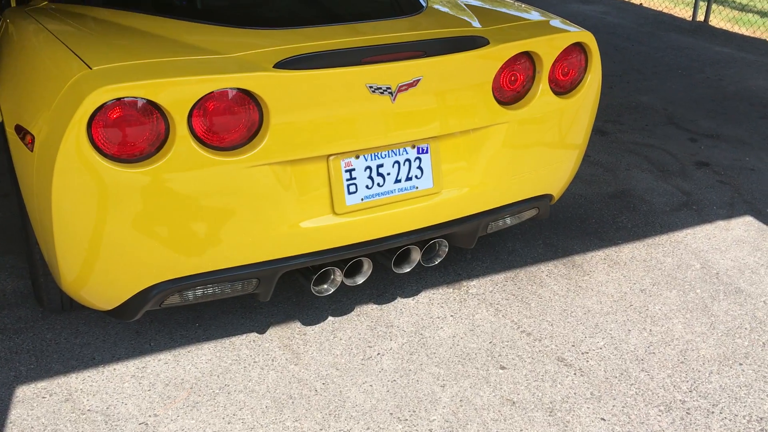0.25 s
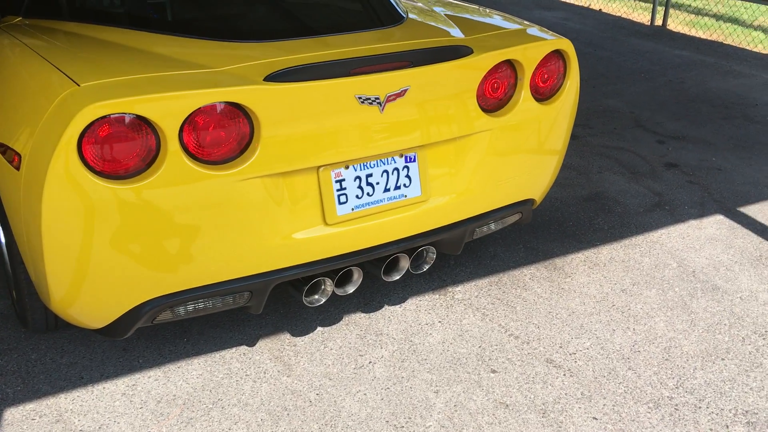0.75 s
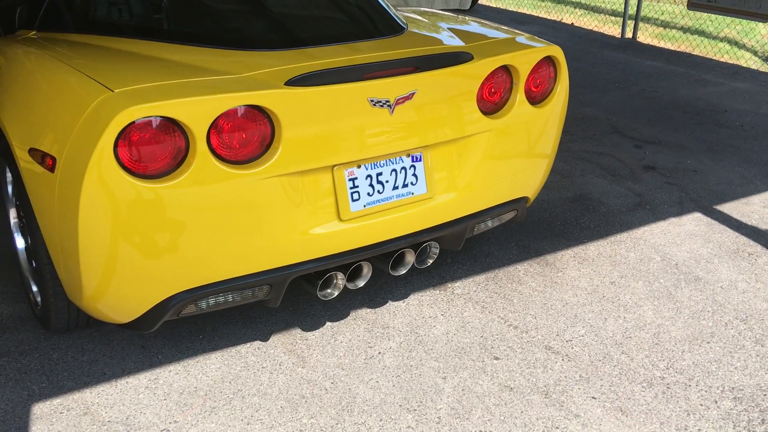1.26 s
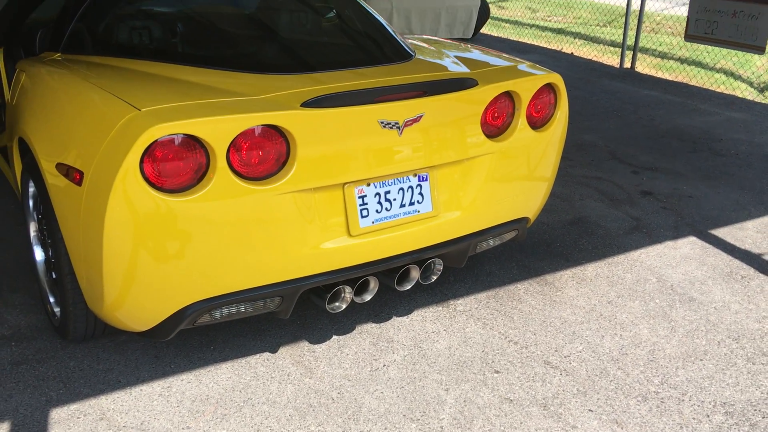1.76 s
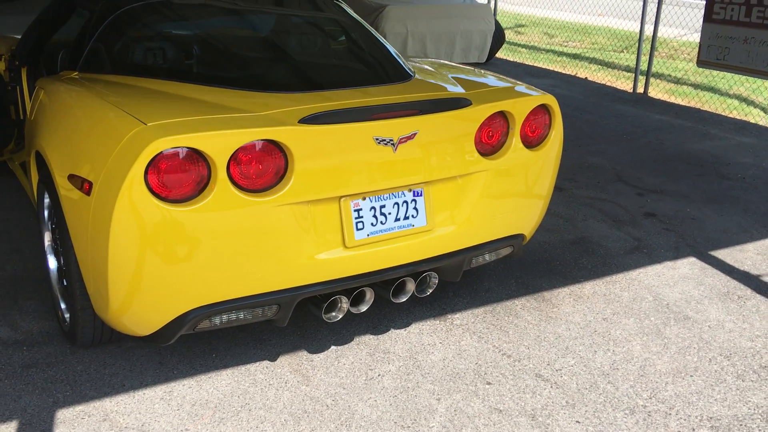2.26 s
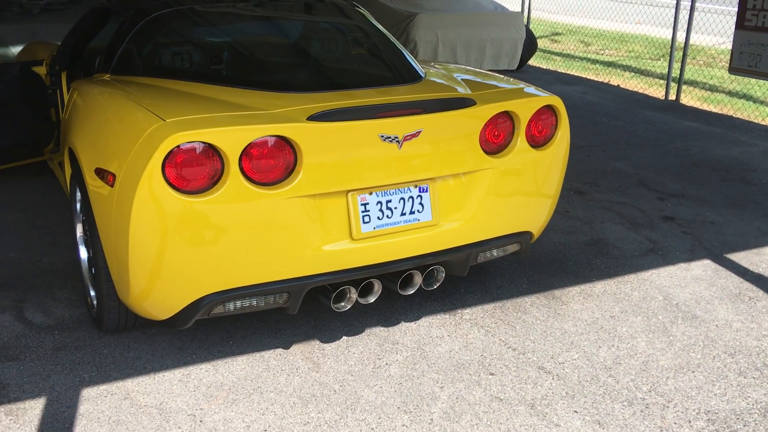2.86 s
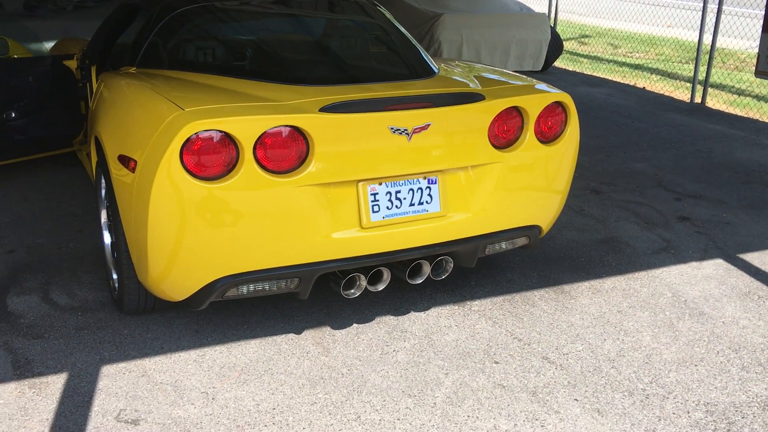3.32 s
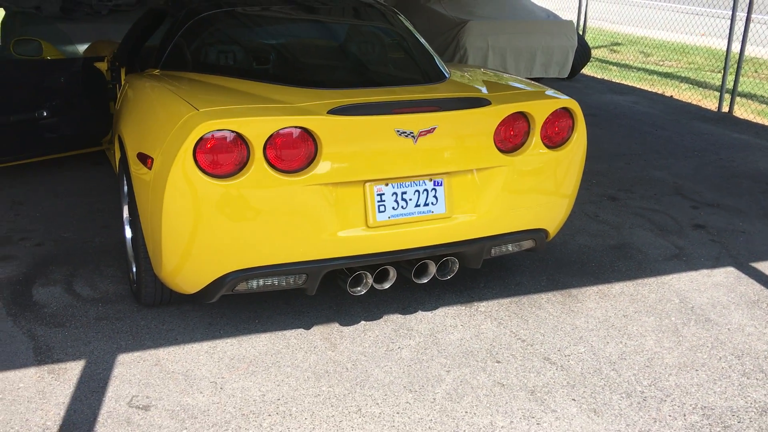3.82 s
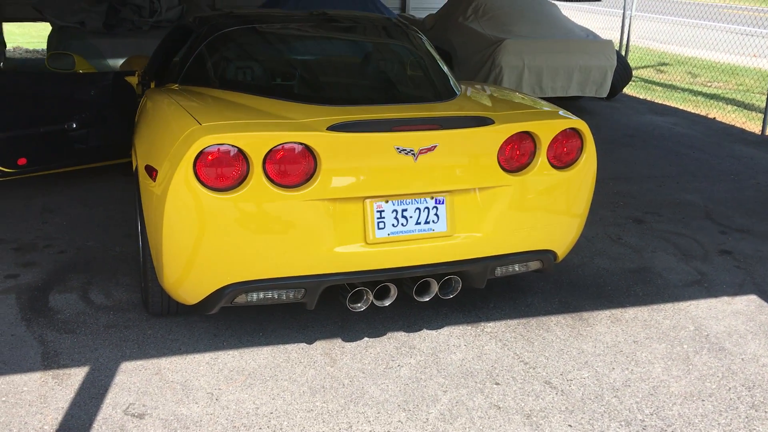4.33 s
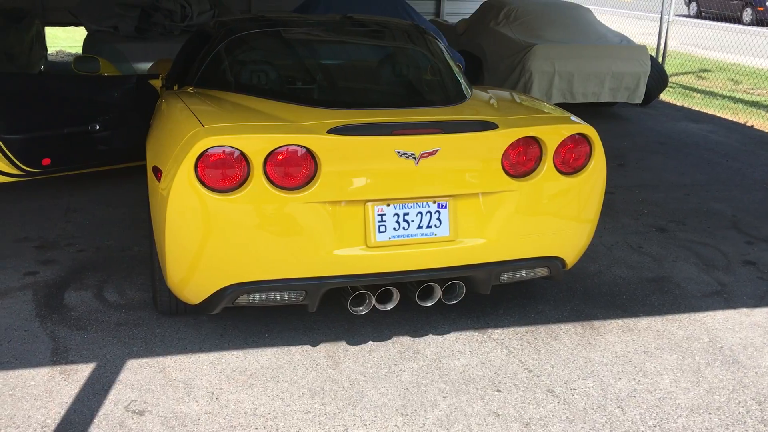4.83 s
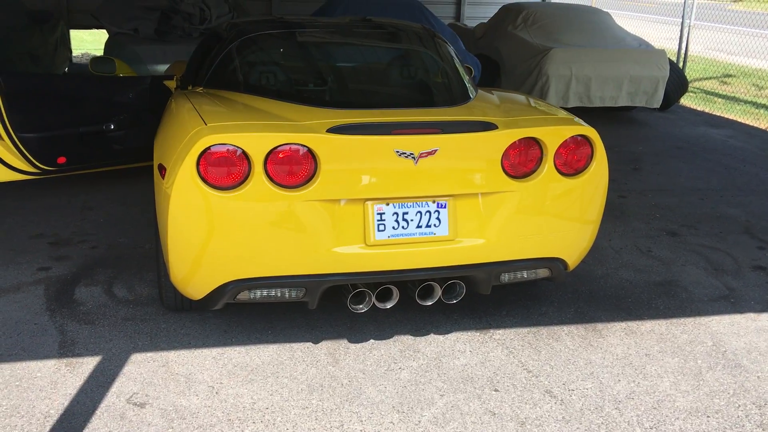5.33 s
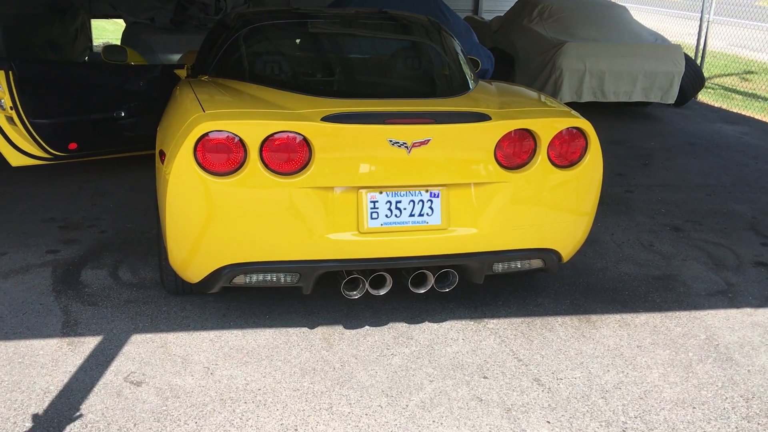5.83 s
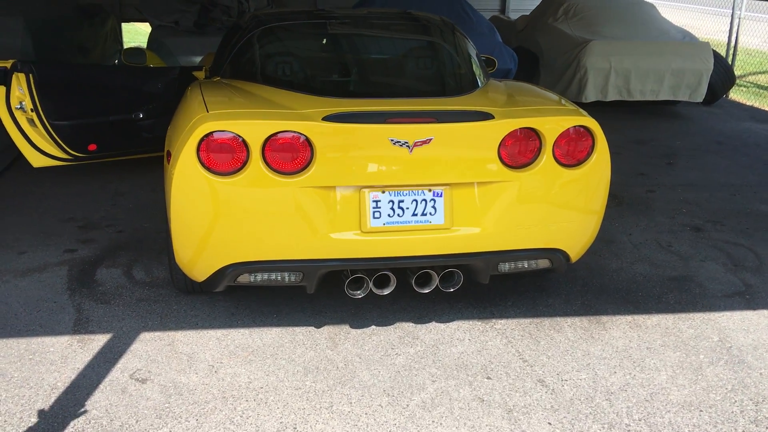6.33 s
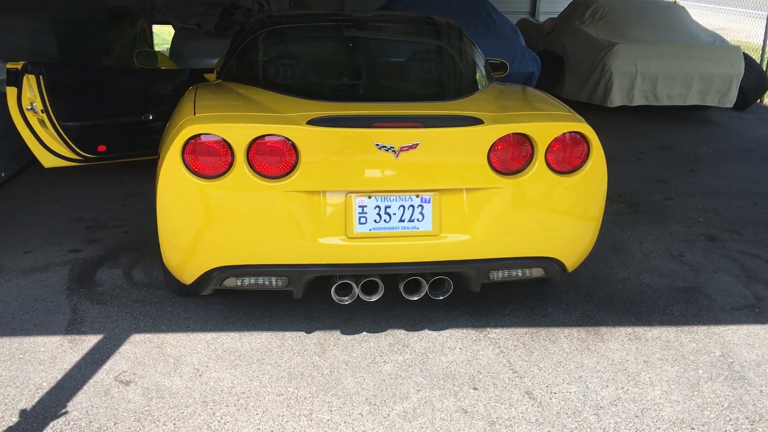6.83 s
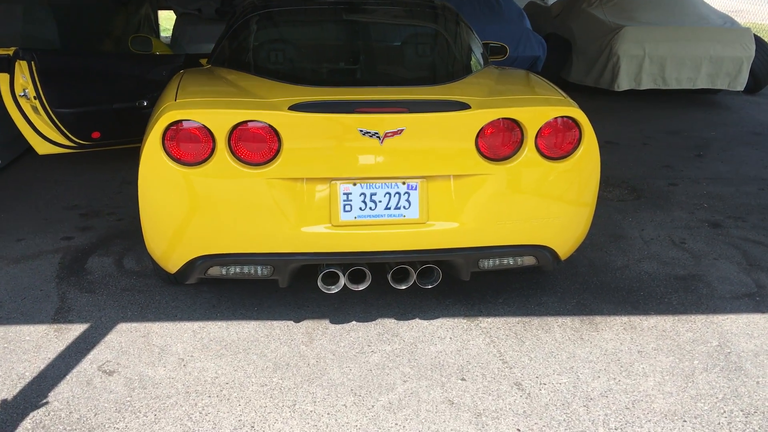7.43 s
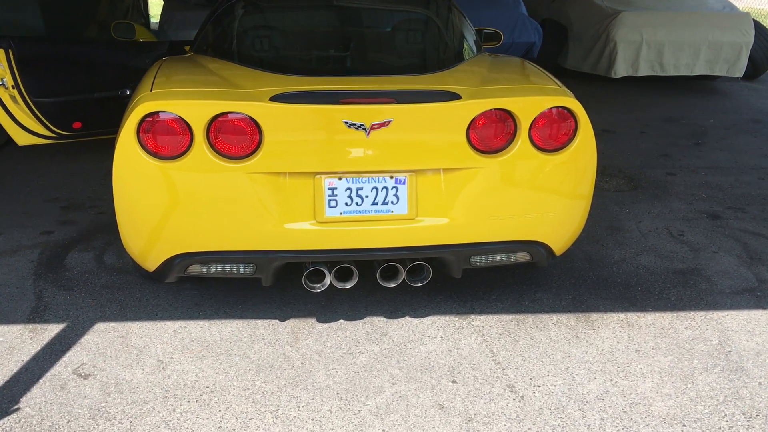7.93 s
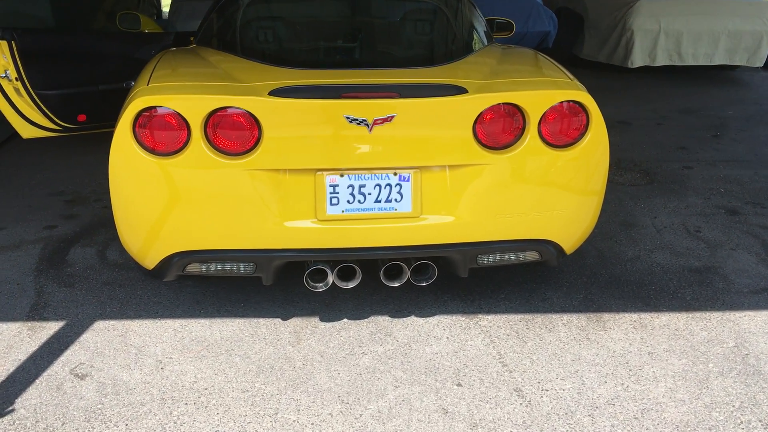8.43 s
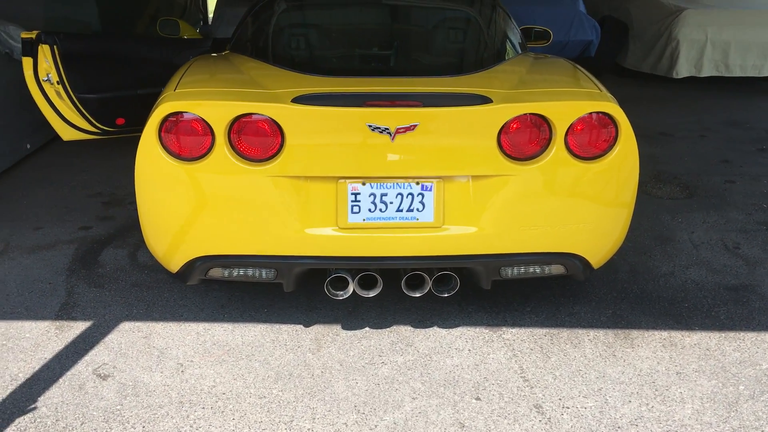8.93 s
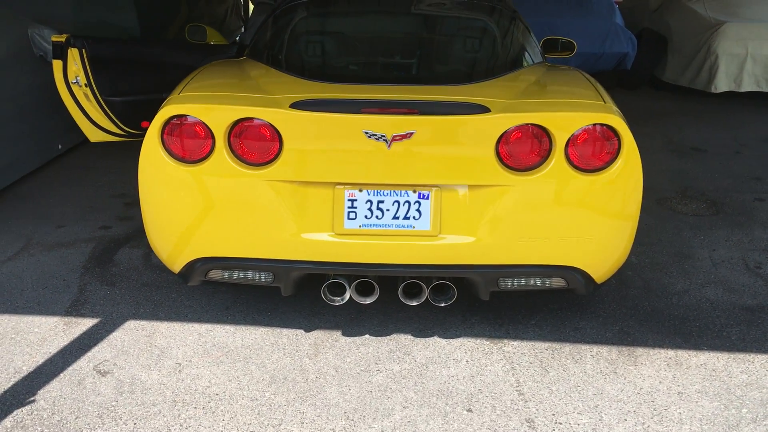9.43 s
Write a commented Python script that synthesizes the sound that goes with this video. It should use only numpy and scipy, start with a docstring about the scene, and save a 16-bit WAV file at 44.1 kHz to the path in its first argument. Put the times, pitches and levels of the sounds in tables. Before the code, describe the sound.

A V8 sports car idles from start to finish, close by under a carport. Its loud exhaust makes a deep, booming throb that surges and dips a little under twice a second, while the engine speed barely wanders. For the first 3 seconds or so, heard from the rear corner, the surges are fairly smooth and rounded, with a throaty growl. Around 4 seconds they start breaking into separate hard, raspy pops, each with a faint spit of gas. From about 7 seconds until the end, near 10 seconds, the microphone moves directly behind the tailpipes, and the barks are more distinct and uneven over the same low lope. A faint whirr of belts and fan with light valve ticking stays in the background, and the carport adds a slight reverberation.

```python
"""A deep, loping throb: a V8 sports car idles under a carport as the listener walks from its rear corner
to the tailpipes. Every sixteen firings (two engine cycles) bring a surge and a lull, and the surge slowly
breaks up into separate hard pops. Each firing is a pressure pulse that booms in the muffler, barks in the
pipe and spits turbulent gas from the tips. The carport reverberates, and the engine bay whirrs behind."""
import sys
import numpy as np
from scipy import signal
from scipy.io import wavfile
from scipy.ndimage import uniform_filter1d

SR = 44100
rng = np.random.default_rng(int(sys.argv[2]) if len(sys.argv) > 2 else 0)


def wrap_up_sound(samples):
    """Save the sound to the file named by the first command line argument, as 16-bit audio."""
    columns = np.atleast_2d(samples).T
    # keep every value between -1 and 1, then stretch to whole-number steps
    tamed = np.clip(columns, -1, 1)
    steps = np.round(tamed * 32767).astype(np.int16)
    wavfile.write(sys.argv[1], SR, steps)


N = 426447
LOPE = 16  # firings in one surge and lull

# the listener's walk: (time [s], place [0 corner, 1 passing, 2 behind])
WALK = [(0, 0.31), (1.1, 0.41), (2.2, 0.61), (4, 0.95), (5.5, 1.5), (7, 1.53), (9.7, 2.28)]
# the surge of hard burns, which creeps earlier in the firing order and breaks up into pops:
# (time [s], middle [firings], length [firings], unevenness [factor on the accents])
SURGE = [(0, 10.68, 11.5, 0.26), (1.6, 9.1, 9.6, 0.059), (2.3, 6.27, 9.3, .37), (3.2, 5.57, 9.4, 0.2),
         (4.1, 4.47, 8.8, 1.28), (6.2, 4.14, 8, 1.3), (7.4, 3.17, 9.8, 1.58), (7.8, 1.62, 10.9, 1.52),
         (9.7, 1.92, 11.75, 1.18)]


def amp(db):
    """Amplitude ratio of a level in decibels."""
    return 10 ** (np.asarray(db) / 20)


def unit(x):
    """Normalisation to an rms of one."""
    return x / np.sqrt(np.mean(x ** 2) + 1e-20)


def read(points, hz):
    """Linear interpolation of (frequency [Hz], value) points on a logarithmic frequency axis."""
    f, value = np.transpose(points)
    return np.interp(np.log(hz + 1), np.log(f + 1), value)


def colour(x, points, size=8192):
    """Minimum-phase filter with the given spectrum, falling 24 dB an octave beyond its ends."""
    hz = abs(np.fft.fftfreq(size, 1 / SR)) + 1
    octaves_out = abs(np.log2(hz / np.clip(hz, points[0][0], points[-1][0])))
    log_gain = np.log(amp(np.maximum(read(points, hz) - 24 * octaves_out, -100)))
    taps = np.fft.ifft(np.exp(np.conj(signal.hilbert(log_gain)))).real
    return signal.oaconvolve(x, taps[:size // 2])[:N]


def pulses(times, gains):
    """Impulse train: one click of the given size at each time."""
    at = np.round(times * SR).astype(int)
    inside = (at >= 0) & (at < N)
    return np.bincount(at[inside], gains[inside], N)


def puffs(clicks, rise_ms, fall_ms):
    """Turbulence as modulated noise: each click releases a puff that swells and decays."""
    ms = np.arange(SR // 10) * 1000 / SR
    shape = (1 - np.exp(-(ms / rise_ms) ** 2)) * np.exp(-ms / fall_ms)
    return unit(signal.oaconvolve(clicks, shape)[:N] * rng.standard_normal(N))


def past_middle(times):
    """Phase in the lope: how many firings each one lies past the middle of the nearest surge."""
    when, middle, _, _ = np.transpose(SURGE)
    offset = np.arange(len(times)) - np.interp(times, when, middle)
    return (offset + LOPE / 2) % LOPE - LOPE / 2


def swayed(times, sway_ms, latest):
    """Phase modulation, once a lope: the lag is greatest `latest` firings past the surge's middle."""
    return times + sway_ms / 1000 * np.cos(2 * np.pi * (past_middle(times) - latest) / LOPE)


def firings():
    """Rotation sets the pulse rate: four firings a turn of a crank that sways with the lope."""
    # the idle hunting around its set speed: (time [s], crank speed [rpm])
    idle_speed = [(0.0, 879.5), (1.01, 869.1), (1.69, 881.0), (2.07, 855.5), (2.42, 894.7), (3.32, 858.6),
                  (4.23, 884.8), (4.96, 859.7), (5.55, 887.9), (6.22, 854.3), (6.54, 873.9), (7.07, 866.7),
                  (7.34, 874.6), (7.46, 864.7), (8.54, 856.5), (8.94, 867.4), (9.28, 871.5), (9.7, 877.8)]
    t = np.arange(N + SR // 20) / SR
    rpm = np.interp(t, *np.transpose(idle_speed))
    count = np.cumsum(rpm) * 4 / 60 / SR
    even = np.interp(np.arange(int(count[-1])), count, t) - .0026
    jitter = .00025 * rng.standard_normal(len(even))
    return swayed(even, sway_ms=0.96, latest=1.91) + jitter


def strength(times, accents_db, lull_db, edge, gap_db, beam_db, scatter_db):
    """Amplitude modulation: each firing's gain, falling from surge to lull over `edge` firings."""
    when, _, length, uneven = np.transpose(SURGE)
    uneven = np.interp(times, when, uneven)
    outside = abs(past_middle(times)) - np.interp(times, when, length) / 2
    lull = .5 + .5 * np.tanh(outside / edge)
    accent = uneven * np.resize(accents_db, len(times))
    # a smooth surge opens and closes with a chuff that stands apart: the firing just inside each is weak
    gap = np.maximum(1 - uneven, 0) * np.exp(-((outside + 1.3) / 0.37) ** 2)
    # directivity: the pipes beam backwards, so the level changes by beam_db for each place walked
    place = np.interp(times, *np.transpose(WALK))
    db = accent - lull_db * lull - gap_db * gap + beam_db * (place - 2)
    return amp(db + scatter_db * rng.standard_normal(len(times)))


def engine_bay(times):
    """Broadband noise of belts and fan with light valve impacts, partly screened by the body."""
    # spectrum of belts, fan and valves: (frequency [Hz], level [dB])
    bay_spectrum = [(40, -47), (200, 12), (500, -3), (800, 9), (1200, 1.5), (2000, -8), (2800, -12.5),
                    (4000, -15), (5000, -20.5), (7000, -21), (10000, -29), (16000, -41)]
    # how much is heard past the body: (time [s], level [dB])
    bay_level = [(0, -46.5), (1.1, -47.5), (1.8, -43), (2.599, -40), (3.502, -42.5), (4.5, -42.5),
                 (5.5, -40.5), (6.298, -42.5), (7.1, -45.5), (8, -49), (8.9, -46), (9.6, -43)]
    impacts = pulses(times + 0.0093, amp(1.7 * rng.standard_normal(len(times))))
    valves = puffs(impacts, rise_ms=0.18, fall_ms=2.3)
    whirr = unit(colour(rng.standard_normal(N) + 0.18 * valves, bay_spectrum))
    return amp(np.interp(np.arange(N) / SR, *np.transpose(bay_level))) * whirr


def carport(x, spacing=20):
    """Reverberation: reflections from roof, walls and asphalt, each band decaying at its own rate."""
    # reverberation time of the carport: (frequency [Hz], time to fall 60 dB [s])
    decay_times = [(60, 1), (250, 1), (1000, 0.13), (4000, 0.13), (14000, 0.68)]
    reflections = np.zeros(SR // 2)
    at = np.arange(SR // 150, len(reflections) - spacing, spacing)
    reflections[at + rng.integers(0, spacing, len(at))] = rng.choice([-1, 1], len(at))
    hz, t, bands = signal.stft(reflections, SR, nperseg=256)
    decay = amp(-60 * t / read(decay_times, hz)[:, None])
    tail = signal.istft(bands * decay, SR, nperseg=256)[1]
    return signal.oaconvolve(x, tail / np.linalg.norm(tail))[:N]


def tips(times, spit):
    """Jet noise: just after the bark, gas hisses out of the tailpipes and scatters under the roof."""
    # spectrum of the gas leaving the tips: (frequency [Hz], level [dB])
    jet_spectrum = [(1500, -42), (2800, -1.5), (4200, 4), (4950, -3.5), (5700, 2), (7000, 1), (9500, 0.5),
                    (10400, -4.5), (11300, -2.5), (15800, -9.5)]
    blows = pulses(times + 0.0035, spit)
    jet = puffs(blows, rise_ms=1.7, fall_ms=5.6)
    scatter = puffs(blows, rise_ms=13, fall_ms=16.0)
    return amp(-55.5) * unit(colour(jet + amp(-2.5) * scatter, jet_spectrum))


def hum(times, boom):
    """Harmonics: the third and fourth multiples of the firing rate carry on between the surges."""
    t = np.arange(N) / SR
    cycles = np.interp(t, times, np.arange(len(times)))
    swell = np.interp(t, times + .017, uniform_filter1d(boom, size=3))
    third = swell ** .5 * np.cos(6 * np.pi * cycles)
    fourth = swell ** .8 * np.cos(8 * np.pi * cycles)
    return amp(-32) * unit(third) + amp(-35.0) * unit(fourth)


def pipe(times, bark):
    """Damped pipe resonance: a valve opens on hot gas, giving a brief tone, then a rough burst."""
    # the bark as ground reflection colours it at each place of the walk: (frequency [Hz], level [dB])
    at_corner = [(310, -38), (520, -34), (668, 1), (760, -8), (913, 0.5), (1120, -7.5), (1440, -13),
                 (1680, -52), (1760, -8.5), (2010, -7), (2360, -13), (2530, -46), (3200, -23), (4160, -50),
                 (7040, -120)]
    in_passing = [(310, -21.5), (520, -9), (587, -1), (689, -12), (743, 0), (913, 7.5), (1090, -6.5),
                  (1370, -7.5), (1640, 0.5), (1820, -16.5), (2420, -14), (2730, -21.5), (3200, -41),
                  (4160, -55), (7040, -120)]
    from_behind = [(310, -32), (520, -19), (574, -17), (615, -15), (738, -6), (796, -7.5), (941, 0),
                   (1100, 0.5), (1390, -13), (1680, -14), (1970, -24.5), (2170, -17.5), (2570, -25),
                   (2830, -72), (3200, -36), (4160, -52), (7040, -120)]
    t = np.arange(N) / SR
    opens = times - .0004
    last = np.maximum(np.searchsorted(opens, t) - 1, 0)
    age = np.maximum(t - opens[last], 0)
    ring_hz = 990 * (1 + 0.078 * rng.standard_normal(len(times)))  # varies with the heat of the gas
    swell = age / .0013
    envelope = bark[last] ** 1.67 * swell ** 2 * np.exp(-swell)
    ring = envelope * np.sin(2 * np.pi * ring_hz[last] * age)
    blows = pulses(times + 0.0021, bark)
    burst = puffs(blows, rise_ms=1.2, fall_ms=4.5) + amp(-5) * puffs(blows, rise_ms=5, fall_ms=14)
    place = np.clip(np.interp(t, *np.transpose(WALK)), 0, 2)
    rasp = np.zeros(N)
    for k, spectrum in enumerate((at_corner, in_passing, from_behind)):
        nearness = np.maximum(1 - abs(place - k), 0)
        rasp += nearness * unit(colour(burst, spectrum))
    return amp(-35.5) * unit(unit(rasp) + amp(-1.5) * unit(ring))


def muffler(times, boom, bark):
    """Cavity resonance: pressure pulses boom in the box, and hard firings growl in its upper range."""
    # each firing's cylinder bank, uneven with a cross-plane crank: (side [+1 left, -1 right])
    banks = [1, -1, 1, -1, -1, 1, -1, 1]
    # extra travel from each cylinder to the tips, in firing order: (delay [ms])
    runner_delays = [0.67, 0.88, 0.19, 1, 1.0, 0.06, 1, 0.83]
    # the gas's low rumble and the muffler's throaty upper range: (frequency [Hz], level [dB])
    rumble_spectrum = [(20, -12), (38, -1), (80, 0), (105, 0), (140, -9), (200, -18), (450, -45)]
    throat_spectrum = [(60, -74.5), (130, 6), (175, -7), (200, 1), (235, 2), (270, -1), (305, -1),
                       (360, -9.5), (400, -18.5), (470, -25), (540, -64), (700, -43.5)]
    box_hz, box_s, bank_s, lag_s = 90, .011, .0017, .017
    t = np.arange(N) / SR
    # uneven burns arrive a little early or late
    slip = .06 * uniform_filter1d(rng.standard_normal(len(times)), size=3)
    cycles = np.interp(t, times, np.arange(len(times)) + slip)
    # the firing rate and its octave swell and sink with the strength of the firings
    swell = np.interp(t, times + lag_s, boom ** 1.15)
    orders = swell * (0.6 * np.cos(2 * np.pi * cycles) + np.cos(4 * np.pi * cycles))
    # each pulse rings the box briefly; the two banks reach it at different moments
    ring_t = np.arange(-SR // 30, SR // 30) / SR
    box_ring = np.exp(-(ring_t / box_s) ** 2) * np.cos(2 * np.pi * box_hz * ring_t)
    knocks = pulses(times + lag_s + bank_s * np.resize(banks, len(times)), boom)
    thud = signal.oaconvolve(knocks, box_ring, "same")
    arrival = times + np.resize(runner_delays, len(times)) / 1000
    push = pulses(arrival + .002, boom + .5 * bark + .05)
    gust = puffs(push, rise_ms=2.4, fall_ms=3.2)
    low = unit(orders) + amp(-8) * unit(thud) + amp(-14) * unit(colour(gust, rumble_spectrum))
    low = signal.sosfilt(signal.butter(2, 32, "high", fs=SR, output="sos"), low)
    throat = colour(unit(push) + .3 * gust, throat_spectrum)
    return amp(-16.0) * unit(low), amp(-26.0) * unit(throat)


def scene():
    """Superposition: one train of firings drives every part of the exhaust and the valves."""
    # accent of each firing in a lope, at an unevenness of one: (boom [dB], bark [dB], spit [dB])
    accents = [(3, -0.5, 3.5), (1, 0, 0.5), (-3, -12, -15), (3.5, 0, 5), (2, -1, -3), (1, -5.5, -1),
               (-1.5, 0.5, 2.5), (3.5, 1, 0.5), (3, -3, 0), (-1.5, -13, 0), (5, 11, 11), (2.5, -15, 2),
               (3, 0, -10), (2, -0.5, 4.5), (-5.5, -13, -15), (-3, -7.5, -12)]
    boom_db, bark_db, spit_db = np.transpose(accents)
    times = firings()
    boom = strength(times, boom_db, lull_db=11.5, edge=0.84, gap_db=1, beam_db=-1.0, scatter_db=1.62)
    bark = strength(times, bark_db, lull_db=14.5, edge=0.32, gap_db=8.5, beam_db=3.0, scatter_db=1.5)
    spit = strength(times, spit_db, lull_db=13.0, edge=.2, gap_db=4, beam_db=1.5, scatter_db=1.4)
    # the long waves in the muffler sway further, so the boom's pitch sags and climbs through each surge
    wave_times = swayed(times, sway_ms=1.426, latest=0.99)
    low, throat = muffler(wave_times, boom, bark)
    pops = pipe(times, bark)
    echo = carport(amp(-5.0) * throat + amp(-4.5) * pops)
    exhaust = low + hum(wave_times, boom) + throat + pops + tips(times, spit)
    return (exhaust + echo + engine_bay(times))[None]


def record(dry):
    """Band limiting: a steep low-pass filter removes the highest treble."""
    cutoff_hz = 15850
    lowpass = signal.firwin(511, cutoff_hz, window=("kaiser", 9), fs=SR)
    return signal.oaconvolve(dry, lowpass[None], "same")


dry = scene()
out = record(dry)
wrap_up_sound(out)
```